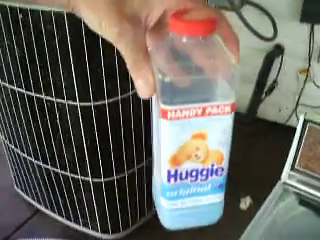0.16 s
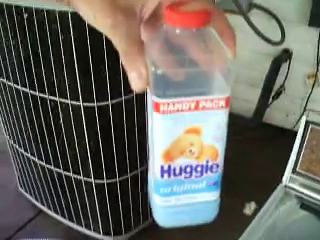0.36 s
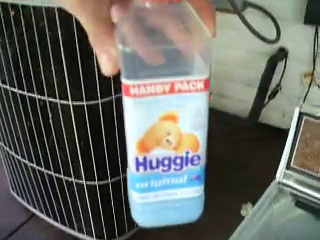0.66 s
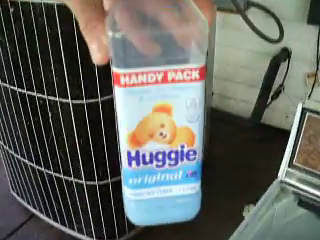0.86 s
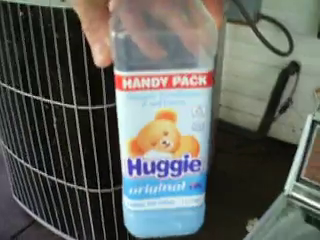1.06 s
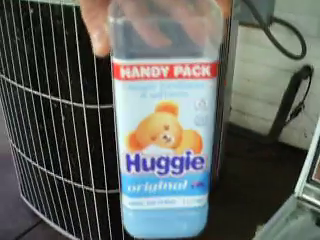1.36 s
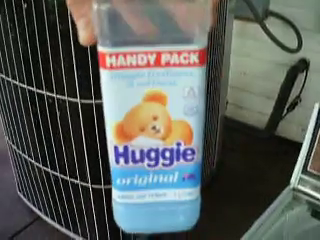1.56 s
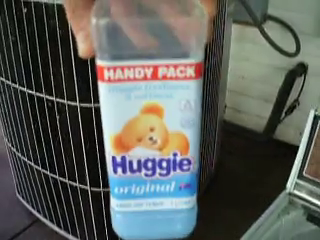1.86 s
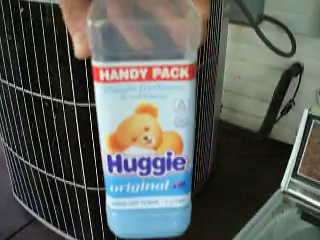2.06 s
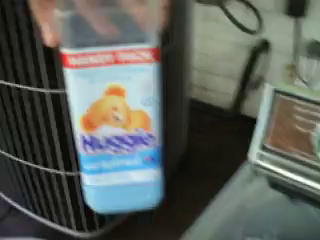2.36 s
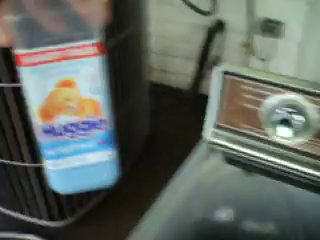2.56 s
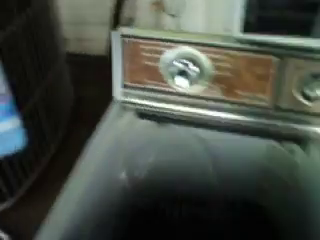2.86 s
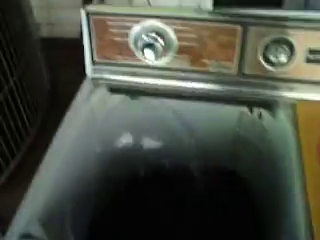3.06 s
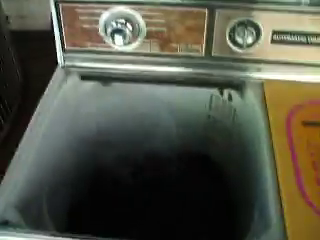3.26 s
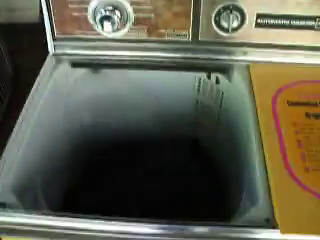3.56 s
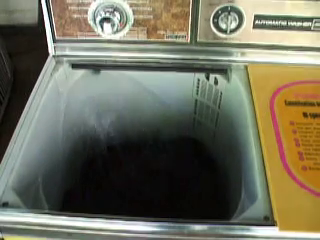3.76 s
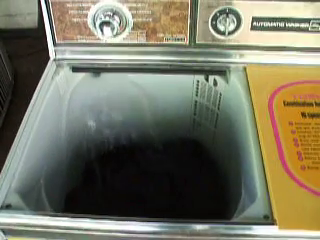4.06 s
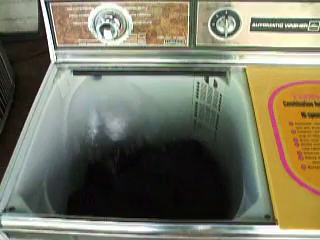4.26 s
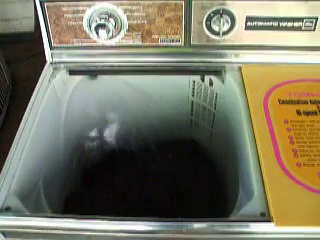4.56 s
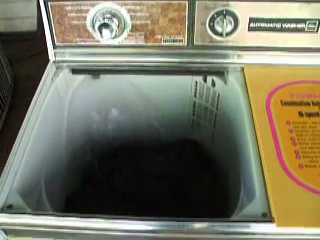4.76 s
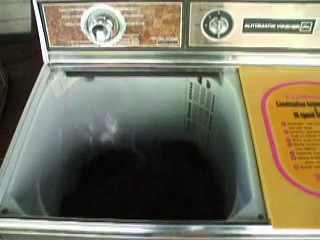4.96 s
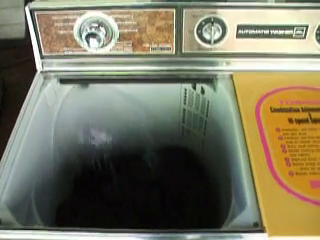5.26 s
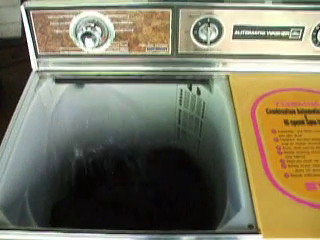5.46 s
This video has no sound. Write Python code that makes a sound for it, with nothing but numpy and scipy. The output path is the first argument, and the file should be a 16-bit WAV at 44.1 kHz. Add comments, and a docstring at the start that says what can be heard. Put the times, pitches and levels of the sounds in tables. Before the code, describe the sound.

Close, narrow-band sound of a washer's water: a hissing jet stops at a clunk, then bubbling churn and bright splashing surges over faint motor hum.

```python
"""Water fills the steel tub of a top-loading washing machine, heard from close by on a small camera.
A hand bumps the camera as an inlet jet of filtered noise hisses and spits, then shuts off near a clunk.
The water churns throughout, a mass of ringing bubbles; after the jet it sweeps the wall in surges
of coloured impacts. Large drops snap and noise bursts knock in the ringing cabinet,
over a motor hum of two wavering sines, whose whine fades out partway."""
import sys
import numpy as np
from scipy import signal
from scipy.fft import rfft, irfft, next_fast_len
from scipy.io import wavfile
from scipy.ndimage import uniform_filter1d

SR = 44100
rng = np.random.default_rng(int(sys.argv[2]) if len(sys.argv) > 2 else 0)


def store_wav(level_fs):
    """Save 16-bit WAV to argv[1]."""
    pcm = np.round(np.clip(np.atleast_2d(level_fs), -1, 1) * 32767)
    wavfile.write(sys.argv[1], SR, pcm.T.astype(np.int16))


N = 248724
TIME = np.arange(N) / SR  # s

JET_SHUT_S = 1.983
# Treble lost on the way out of the tub. Each row: frequency in Hz, gain in dB.
RIM_LOSS = [(6500, 1), (7300, -2.5), (8000, -8), (8800, -22)]
# Rattle of loose parts, also the grit of the drops. Each row: frequency in Hz, relative gain in dB.
CLATTER_COLOUR = [(200, -32), (900, -13.5), (2500, -9.5), (3300, -10), (4400, -1), (6000, -8.5), (7500, -2),
                  (8300, -8.5), (8900, -30)]
# The hollow note of the churning at rest, and how far it climbs in a full surge.
HOLLOW_HZ, HOLLOW_CLIMB_HZ, HOLLOW_DB = 1682, 343, -4.5


def gain_of(db):
    """Decibels to amplitude."""
    return 10 ** (np.asarray(db) / 20)


def evened(x):
    """Scales to an rms of one."""
    return x / np.sqrt(np.mean(x ** 2) + 1e-20)


def follow(rows, axis=1):
    """One column of a curve, at every sample."""
    rows = np.asarray(rows)
    return np.interp(TIME, rows[:, 0], rows[:, axis])


def read(points, hz):
    """The gain of a spectrum, joined on a log-frequency axis."""
    f, db = np.transpose(points)
    return gain_of(np.interp(np.log(hz + 1), np.log(f), db))


def colour(x, points):
    """Filters by a spectrum, without phase shift."""
    size = next_fast_len(len(x) + 512)
    gains = read(points, np.fft.rfftfreq(size, 1 / SR))
    return irfft(rfft(x, size) * gains, size)[:len(x)]


def ring(x, modes):
    """Passes x through resonances side by side."""
    return sum(gain_of(db) * signal.lfilter(*signal.iirpeak(hz, hz / width, SR), x)
               for hz, width, db in modes)


def resonate(x, hz, width_hz):
    """A resonance that follows a curve: shifts it down to zero, smooths twice, and shifts back."""
    turn = np.exp(2j * np.pi * np.cumsum(hz) / SR)
    r = np.exp(-np.pi * width_hz / SR)
    smooth = signal.lfilter([(1 - r) ** 2], [1, -2 * r, r * r], x / turn)
    return 2 * (turn * smooth).real


def add(mix, s, sound):
    """Mixes a sound in at time s."""
    part = mix[max(round(s * SR), 0):][:len(sound)]
    part += sound[:len(part)]


def wander(rate_hz):
    """Slow chance of rms one, with little movement above the given rate."""
    hz = np.fft.rfftfreq(N, 1 / SR)
    weight = hz / (hz + 2) / (1 + (hz / rate_hz) ** 2)
    return evened(irfft(rfft(rng.standard_normal(N)) * weight, N))


def patter(per_s, spread_db):
    """Impacts at random moments; a positive spread makes a few stand out, a negative one a few recede."""
    size = gain_of(spread_db * np.minimum(rng.exponential(1, N), 4))
    struck = rng.random(N) < per_s / SR
    return evened(size * rng.choice([-1, 1], N) * struck)


def until(s, fade):
    """One up to time s, then a short fade to nothing."""
    return np.clip((s - TIME) / fade + 1, 0, 1)


def droplets(per_s, spread_db, low_hz, high_hz, cycles, count=24):
    """Tiny bubbles of many sizes, each ringing for a few cycles and rising as it nears the surface."""
    out = np.zeros(N)
    for hz in np.geomspace(low_hz, high_hz, count):
        age = np.arange(0, 6, hz / cycles / SR)
        ping = age * np.exp(-age) * np.sin(2 * np.pi * cycles * age * (1 + 0.016 * age))
        out += signal.oaconvolve(patter(per_s / count, spread_db), ping / np.linalg.norm(ping))[:N]
    return evened(out)


def hum():
    """The motor's mains hum and thin whine are sines whose pitch and level waver; the whine fades out."""
    # Each row: time in seconds, level in dB before the shared waver.
    hum_levels = [(0, -64.5), (1.9, -57), (2.1, -66.5), (5.0, -58)]
    hum_hz, whine_hz, whine_db = 118.7, 720.6, -58.5
    clock = TIME + np.cumsum(0.0028 * wander(rate_hz=7.6)) / SR
    mains = gain_of(follow(hum_levels)) * np.sin(2 * np.pi * hum_hz * clock)
    whine = gain_of(whine_db) * until(3.5, fade=0.4) * np.sin(2 * np.pi * whine_hz * clock)
    return np.sqrt(2) * (mains + whine) * gain_of(2 * wander(rate_hz=8.9))


def bumps():
    """The hand shifts on the camera: decaying low noise thumps straight into the microphone."""
    # Each row: start in seconds, level in dB, decay time in seconds.
    bump_rows = [(0.0, -41, 0.14), (0.131, -25.5, 0.0039), (0.149, -27, 0.0018)]
    # Their dull colour. Each row: frequency in Hz, relative gain in dB.
    bump_colour = [(20, 8.5), (80, 4.5), (200, -4.5), (500, -6), (1200, -22), (3000, -50)]
    out, t = np.zeros(N), np.arange(16384) / SR
    lead = 256  # samples of room for the filter to ring ahead of the thump
    for s, db, length in bump_rows:
        force = np.exp(-t / length)
        thump = colour(np.pad(force * rng.standard_normal(len(t)), (lead, 0)), bump_colour)
        add(out, s - lead / SR, gain_of(db) * evened(thump) * np.sqrt(np.mean(force ** 2)))
    return out


def knocks():
    """A short rattle of contacts clanks in the panels and lid, then the frame shudders more slowly."""
    # Each row: start in seconds, level in dB, length of the rattle in seconds (spread of its bell curve),
    # lid in dB, shudder in dB (both relative), time the shudder takes to peak in seconds.
    knock_rows = [(0.127, -31, 0.0041, -5, -5, 0.0041), (1.943, -24.5, 0.0057, 3.5, -10, 0.015),
                  (3.292, -26, 0.011, -1.5, -10.5, 0.024), (3.456, -21, 0.015, -18, -10.5, 0.0065),
                  (3.522, -34.5, 0.014, -9, -2.5, 0.013), (5.033, -29.5, 0.0066, 7, -19, 0.012),
                  (5.046, -20, 0.0076, -5, -14, 0.012)]
    # Resonances of frame, side panels and lid. Each row: frequency in Hz, width in Hz, relative gain in dB.
    frame_modes = [(176, 17, 11), (309, 31, 2.5), (412, 62, 10), (540, 260, -28)]
    panel_modes = [(885, 74, -4.5), (1400, 280, -3), (1600, 82, -1)]
    lid_modes = [(1861, 60, 9), (2380, 330, -23.5)]
    rise_s, panels_db = 0.0012, -6
    shudder_panels_db, shudder_clatter_db = -3.5, -7.5
    out, t = np.zeros(N), np.arange(8192) / SR
    for s, db, length, lid_db, shudder_db, shudder_s in knock_rows:
        sway = t / shudder_s * np.exp(1 - t / shudder_s)
        force = np.minimum(t / rise_s, 1) * np.exp(-(t / length) ** 2 / 2)
        contacts, shaking = np.array([force, sway]) * rng.standard_normal((2, len(t)))
        blow = (evened(colour(contacts, CLATTER_COLOUR))
                + gain_of(panels_db) * evened(ring(contacts, panel_modes))
                + gain_of(lid_db) * evened(ring(contacts, lid_modes)))
        # the frame shakes the panels and loose parts with it
        shudder = (evened(ring(shaking, frame_modes))
                   + gain_of(shudder_panels_db) * evened(ring(shaking, panel_modes))
                   + gain_of(shudder_clatter_db) * evened(colour(shaking, CLATTER_COLOUR)))
        blow *= np.sqrt(np.mean(force ** 2))
        shudder *= gain_of(shudder_db) * np.sqrt(np.mean(sway ** 2))
        add(out, s, gain_of(db) * (blow + shudder))
    return colour(out, RIM_LOSS)


def drops():
    """Large drops snap on the steel, each a brief burst around its own pitch with a spatter of grit."""
    # The largest drops. Each row: start in seconds, level of the snap in dB before the rim loss,
    # central pitch in Hz, length in seconds (the snap peaks halfway through it).
    large_drops = [(0.118, -15, 5730, 0.0027), (0.1395, -12, 5940, 0.00072), (0.231, -15.5, 4900, 0.0014),
                   (0.676, -21.5, 6130, 0.0017), (0.775, -16.5, 6530, 0.0008), (1.042, -22.5, 3680, 0.0022),
                   (1.104, -21.5, 5360, 0.0025), (1.603, -14.5, 4700, 0.0017), (2.3255, -20, 4810, 0.0019),
                   (2.414, -21.5, 6220, 0.0027), (2.78, -21.5, 5700, 0.0021), (3.251, -23.5, 4500, 0.002),
                   (3.403, -15.5, 5970, 0.0018), (4.297, -14, 4820, 0.00052), (5.0312, -14.5, 5470, 0.0023),
                   (5.0754, -15, 4950, 0.0022), (5.1165, -22, 4040, 0.0025)]
    # smaller drops fall at random, within a spread either side of these centres
    stray_per_s, stray_db, spread_db = 9.8, -25.5, 2
    stray_hz, spread_octaves, stray_s = 5770, 0.27, 0.0011
    strays = []
    for when, size, pitch in rng.random((round(stray_per_s * N / SR), 3)):
        db = stray_db + spread_db * (2 * size - 1)
        hz = stray_hz * 2 ** (spread_octaves * (2 * pitch - 1))
        strays.append((when * N / SR, db, hz, stray_s))
    out, t = np.zeros(N), np.arange(2048) / SR
    for s, db, hz, length in [*large_drops, *strays]:
        age = t / (length / 2)
        drift = 0.15 * evened(uniform_filter1d(rng.standard_normal(len(t)), size=10))
        snap = age * np.exp(1 - age) * np.sin(2 * np.pi * np.cumsum(hz * (1 + drift)) / SR)
        grit = gain_of(-8) * colour(rng.standard_normal(len(t)) * np.exp(-age / 2), CLATTER_COLOUR)
        add(out, s, gain_of(db) * (snap + grit))
    return colour(out, RIM_LOSS)


def jet():
    """Turbulence hisses and whistles in the inlet, and fine drops spit from the jet, until the valve shuts."""
    # Each row: time in seconds, gain in dB over hiss and spit together.
    jet_levels = [(0, -27), (0.2, -31.5), (0.5, -31.5), (0.75, -34.5), (1.3, -32.5), (1.94, -30)]
    # Each row: frequency in Hz, relative gain in dB.
    hiss_colour = [(100, -13.5), (700, -5.5), (1400, -3), (2200, -7), (3000, -5.5), (3800, -0.5), (4700, 3),
                   (5400, 7), (6400, 3), (7300, 0), (8000, -8.5), (8800, -67)]
    # Resonances of the inlet. Each row: frequency in Hz, width in Hz, relative gain in dB.
    inlet_modes = [(1876, 42, 16), (3576, 78, 7.5), (4060, 85, 11.5), (5250, 47, -24.5), (6250, 110, -25)]
    rush = rng.standard_normal(N) * gain_of(1.5 * wander(rate_hz=46))
    whistle = ring(rng.standard_normal(N), inlet_modes)
    hiss = evened(colour(rush, hiss_colour) + whistle)
    spit = droplets(per_s=130, spread_db=4.5, low_hz=5600, high_hz=8800, cycles=1.6)
    mix = gain_of(-1.07) * hiss + gain_of(-9.5) * colour(spit, RIM_LOSS)
    return gain_of(follow(jet_levels)) * until(JET_SHUT_S, fade=0.02) * mix


def churn(swell, hollow_db):
    """Falling water beats bubbles into the pool, with a climbing hollow note, and booms the tub's air."""
    # Each row: time in seconds, churn in dB, boom of the tub in dB, both before the trims below.
    churn_levels = [(0, -37, -35), (0.2, -45, -49), (0.8, -42, -52.5), (1.5, -39, -45.5), (2.0, -39, -44),
                    (2.5, -40, -57.5), (3.4, -37.5, -46.5), (4.05, -42, -50), (4.95, -36, -37.5),
                    (5.35, -35, -50.5), (5.63, -39, -45)]
    # Each row: frequency in Hz, relative gain in dB.
    bubble_colour = [(300, -13), (600, -10.5), (850, -7), (1150, -9), (1480, -7), (1800, 0.5), (2150, -2.5),
                     (2500, -6.5), (3100, -8.5), (4400, -7), (6000, -6), (7300, -13.5), (8700, -38.5)]
    # Throaty gurgle of the pool, and air modes of the tub.
    # Each row: frequency in Hz, width in Hz, relative gain in dB.
    gurgle_modes = [(428, 35, 4.5), (460, 18, -8.5)]
    air_modes = [(123.6, 35, 0), (158, 10, -13), (418, 34, -4), (501, 11, -4)]
    fizz = droplets(per_s=5000, spread_db=5.0, low_hz=514, high_hz=8340, cycles=4.1)
    bright_fizz = evened(np.diff(fizz, prepend=0))
    bubbles = evened(colour(bright_fizz + gain_of(6) * rng.standard_normal(N), bubble_colour))
    note_hz = HOLLOW_HZ + HOLLOW_CLIMB_HZ * swell
    hollow = evened(resonate(patter(per_s=3700, spread_db=2.5), note_hz, width_hz=353))
    gurgle = evened(ring(patter(per_s=1500, spread_db=1.5), gurgle_modes))
    pool = gain_of(1.5) * bubbles + gain_of(hollow_db) * hollow + gain_of(-11.5) * gurgle
    calm_db = -7 * until(JET_SHUT_S, fade=0.063)  # the pool churns harder once the jet has shut
    boom = evened(ring(patter(per_s=1800, spread_db=-1.0), air_modes))
    boom_db = follow(churn_levels, axis=2) - 7.5
    return gain_of(follow(churn_levels) + calm_db) * pool + gain_of(boom_db) * boom


def surges():
    """Surges arrive, change speed and level, hold and drain; the strongest leads.

    Gives the gain and speed of the water on the wall, the swell (0-1) and the hollow note's dB."""
    # Each row: start in seconds, rise in seconds, hold in seconds, first level in dB, full level in dB,
    # first speed, full speed (factors on the pitch of the spray), hollow note in dB.
    surge_rows = [(2.408, 0.12, 0.015, -37, -30.5, 0.72, 0.87, -2),
                  (2.6, 0.055, 0.088, -38.5, -36.5, 0.8, 0.84, -8),
                  (2.819, 0.22, 0.23, -33.5, -30.5, 0.62, 1.11, -11.5),
                  (3.33, 0.04, 0.14, -43, -41, 0.9, 1.12, 2),
                  (3.805, 0.23, 0.294, -39.5, -30, 0.59, 1, 1.5),
                  (4.324, 0.096, 0.0056, -28.5, -29, 0.56, 0.73, -6),
                  (4.458, 0.096, 0.455, -28.5, -28.5, 0.93, 1.03, 0),
                  (5.134, 0.04, 0.011, -42, -34.5, 0.75, 0.92, -9),
                  (5.408, 0.13, 0.1, -35, -27.5, 0.62, 0.87, -5)]
    arrive_s, drain_s = 0.022, 0.035
    trickle_db, trickle_speed = -44, 0.85  # on the wall between surges
    powers = [gain_of(trickle_db) ** 2 * np.ones(N)]
    states = [np.outer([trickle_speed, 0, HOLLOW_DB], np.ones(N))]
    for start, rise, hold, first_db, full_db, first_speed, full_speed, hollow_db in surge_rows:
        age = TIME - start
        swell = np.clip(age / rise, 0, 1)
        arrival = np.clip(age / arrive_s + 1, 0, 1)
        drain = np.exp(-np.maximum(age - rise - hold, 0) / drain_s)
        level_db = first_db + (full_db - first_db) * np.sin(np.pi / 2 * swell)
        powers.append((arrival * drain * gain_of(level_db)) ** 2)
        speed = first_speed + (full_speed - first_speed) * swell
        states.append(np.array([speed, swell, HOLLOW_DB + (hollow_db - HOLLOW_DB) * swell]))
    total = sum(powers)
    # overlapping surges share the water's state by their power
    speed, swell, hollow_db = sum(power * state for power, state in zip(powers, states)) / total
    return np.sqrt(total), speed, swell, hollow_db


def splash(strength, speed):
    """Clumps of drops strike the tub wall; the faster the water, the higher its spray."""
    # The spray at a speed of one. Each row: frequency in Hz, relative gain in dB.
    spray_colour = [(300, -24), (1300, -21.5), (2500, -14.5), (3400, -7.5), (3700, 1.5), (4500, 0.5),
                    (5400, 1.5), (6300, -2), (7300, -2.5), (9000, -11.5), (13000, -21.5)]
    # Ringing of the tub wall under the spray. Each row: frequency in Hz, width in Hz, relative gain in dB.
    wall_modes = [(2030, 150, -4.5), (2315, 87, -5), (2800, 110, -5), (3826, 74, 0.5), (4290, 110, 8.5),
                  (4584, 45, 10.5), (5020, 120, 5.5), (5260, 120, 5.5), (6450, 93, -1.5), (6750, 110, -3),
                  (7250, 80, -4)]
    clumps = gain_of(2.22 * wander(rate_hz=73))
    hz, t, z = signal.stft(patter(per_s=7000, spread_db=2.0) * clumps, SR, nperseg=256)
    pitch = np.interp(t, TIME, speed)
    # each clump has its own mix of drop sizes, and so its own colour
    patches = uniform_filter1d(rng.standard_normal(z.shape), size=5, axis=0)
    patches = evened(uniform_filter1d(patches, size=5, axis=1))
    shaped = z * read(spray_colour, hz[:, None] / pitch) * gain_of(1.95 * patches)
    spray = signal.istft(shaped, SR, nperseg=256)[1][:N]
    wall = ring(rng.standard_normal(N) * clumps, wall_modes) * speed ** 2
    water = strength * evened(colour(spray + gain_of(1.0) * wall, RIM_LOSS))
    # fine spatter keeps ticking between the surges
    spatter = droplets(per_s=420, spread_db=3.5, low_hz=5500, high_hz=9000, cycles=1.3)
    mix = water + gain_of(-45) * colour(spatter, RIM_LOSS)
    return (1 - until(JET_SHUT_S, fade=0.029)) * mix


def tub(x, t60=0.081, wet_db=-14):
    """Dense short reflections between the steel walls."""
    t = np.arange(6000) / SR
    struck = (rng.random(len(t)) < 2000 / SR) * (t > 0.002)  # 2000 reflections a second, after 2 ms
    tail = rng.standard_normal(len(t)) * struck * np.exp(-np.log(1000) * t / t60)
    return x + gain_of(wet_db) * signal.oaconvolve(x, tail / np.linalg.norm(tail))[:N]


def scene():
    """Water and knocks sound in the tub, which radiates little deep bass; hum and bumps bypass it."""
    strength, speed, swell, hollow_db = surges()
    inside = tub(knocks() + drops() + churn(swell, hollow_db) + jet() + splash(strength, speed))
    radiated = colour(inside, [(20, -5), (60, -2), (100, -0.5)])  # Hz, dB
    return (hum() + bumps() + radiated)[None]


def record(dry):
    """A narrow-band camera microphone whose signal rests on a steady offset."""
    offset, edge_hz = -0.075, 8980
    lowpass = signal.firwin(301, edge_hz, window=("kaiser", 9), fs=SR)
    return offset + signal.oaconvolve(dry, lowpass[None], "same")


dry = scene()
out = record(dry)
store_wav(out)
```